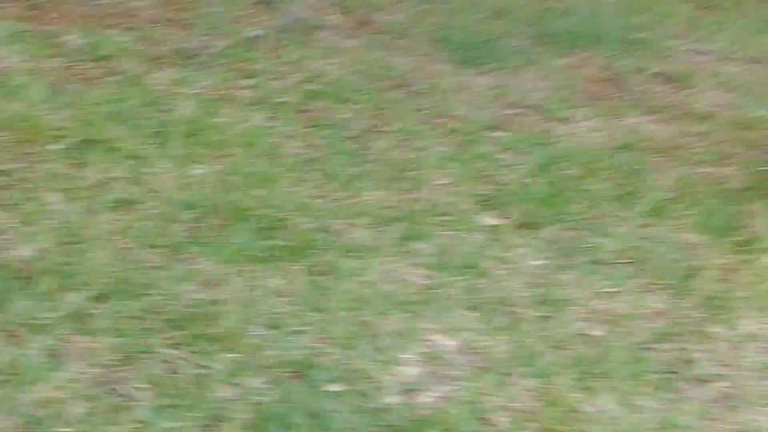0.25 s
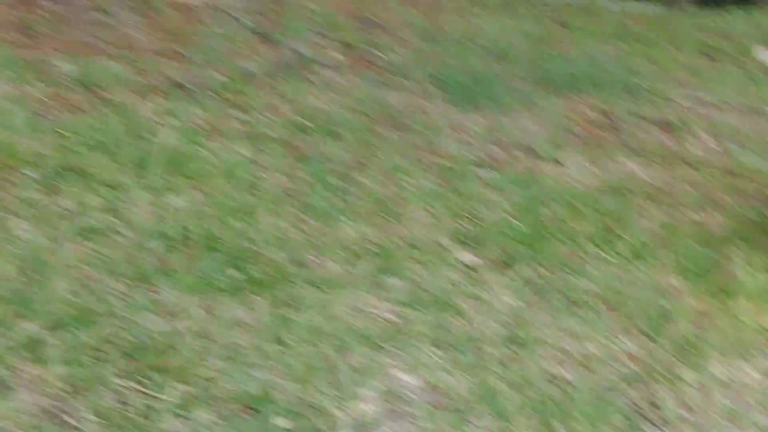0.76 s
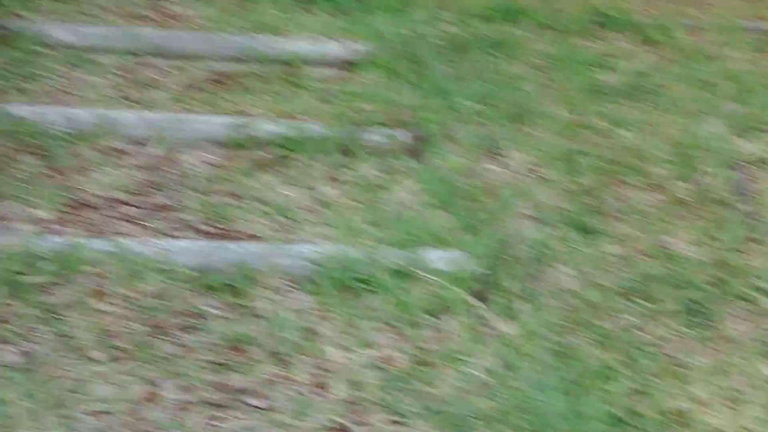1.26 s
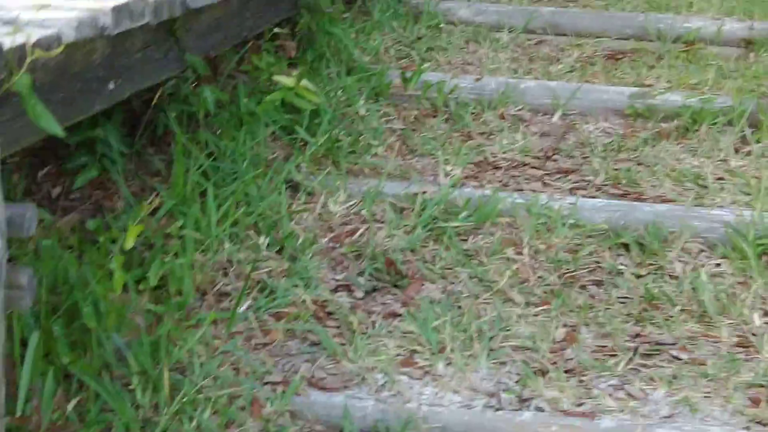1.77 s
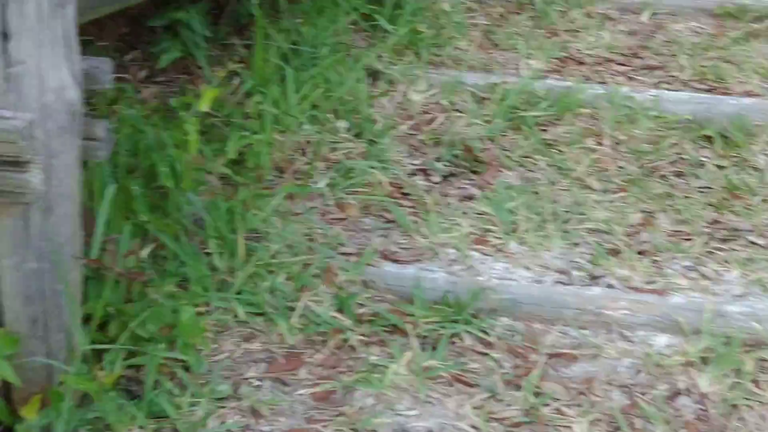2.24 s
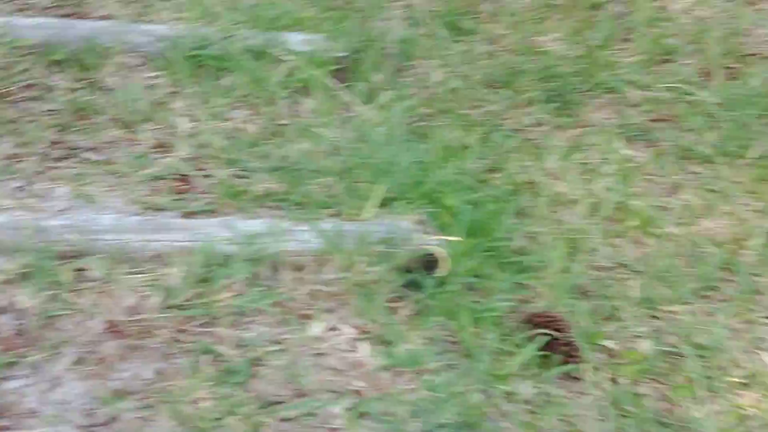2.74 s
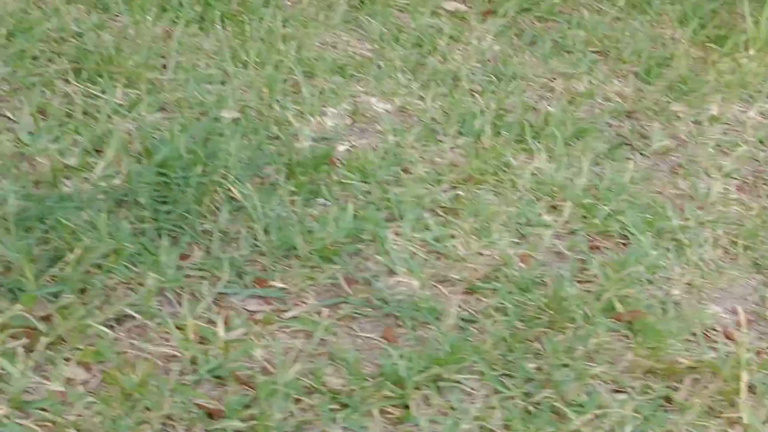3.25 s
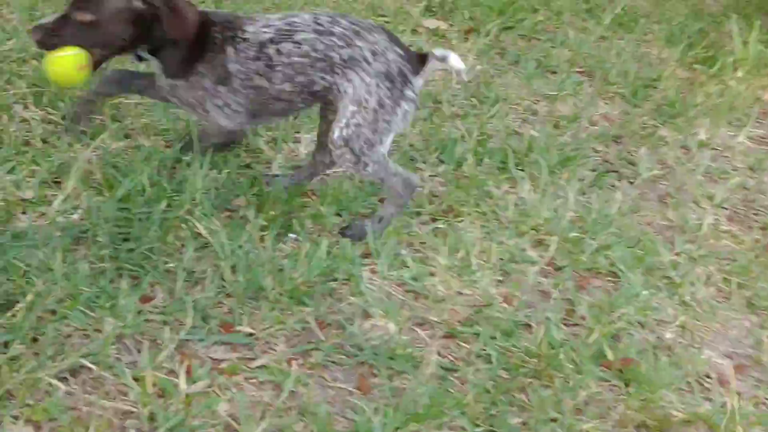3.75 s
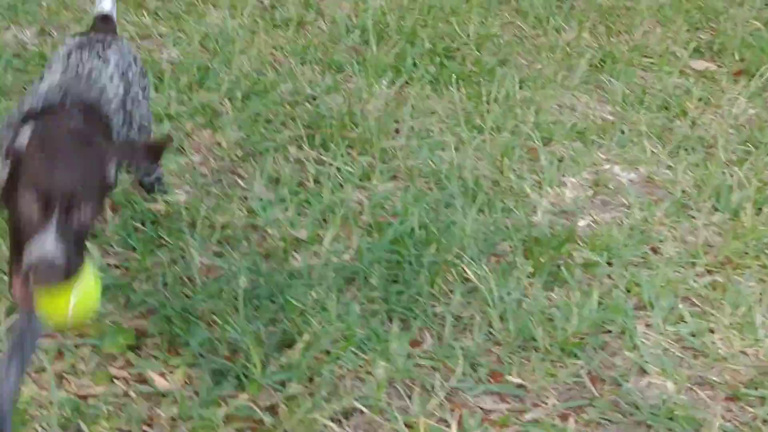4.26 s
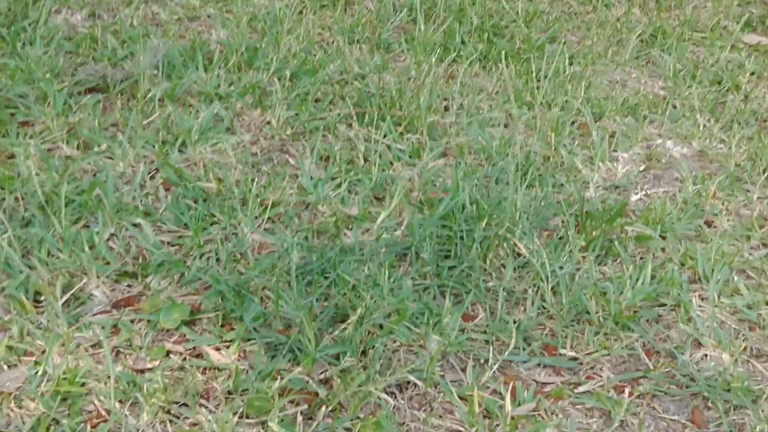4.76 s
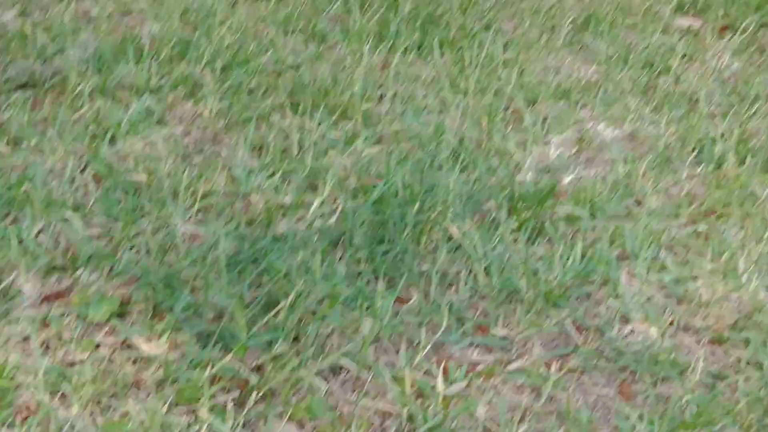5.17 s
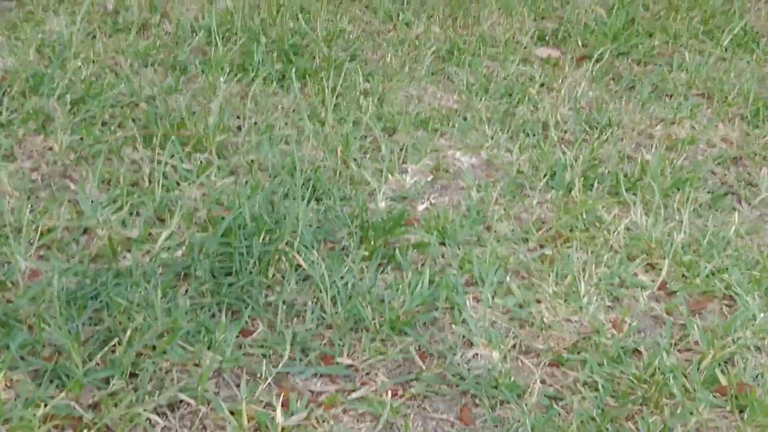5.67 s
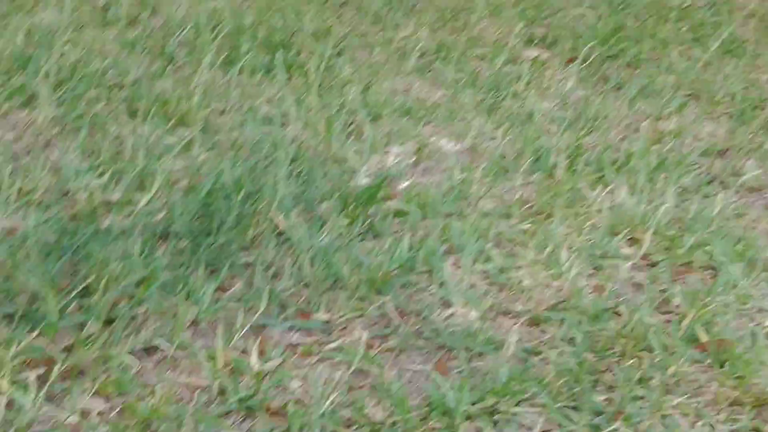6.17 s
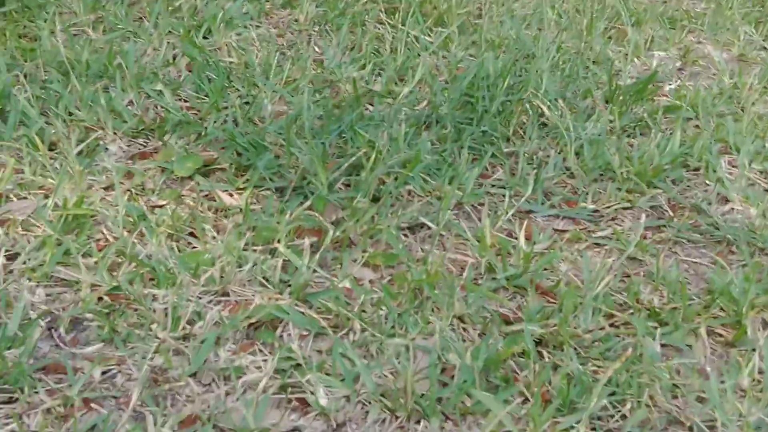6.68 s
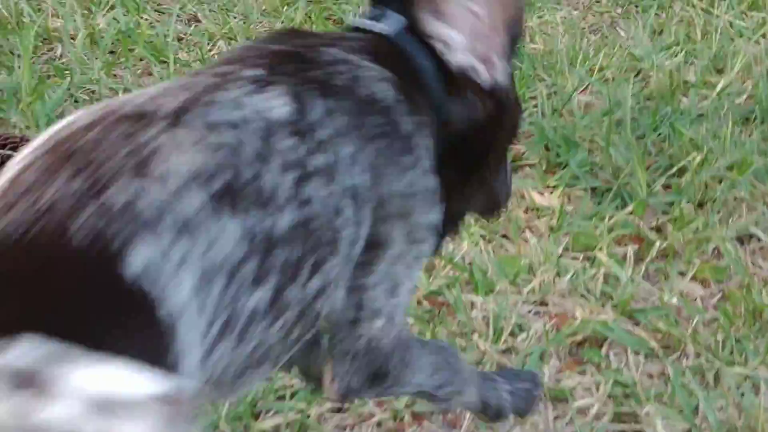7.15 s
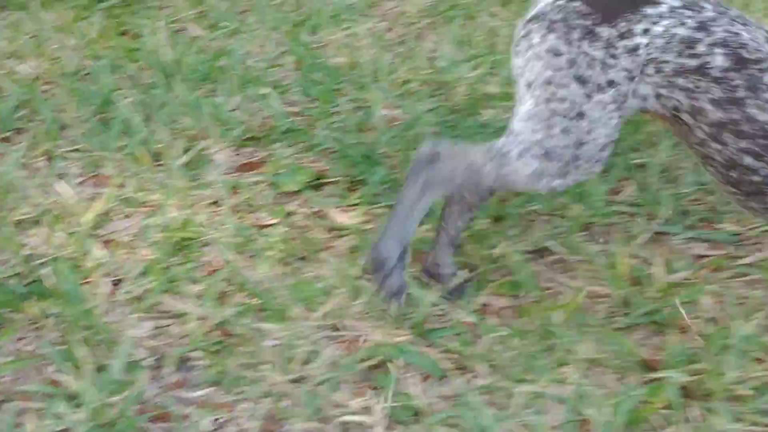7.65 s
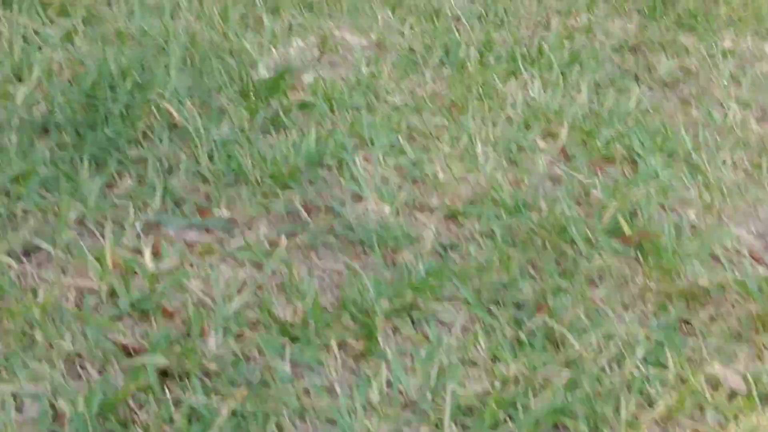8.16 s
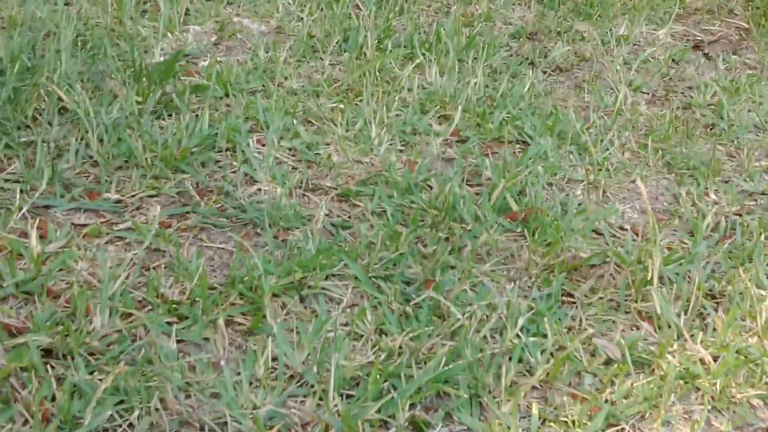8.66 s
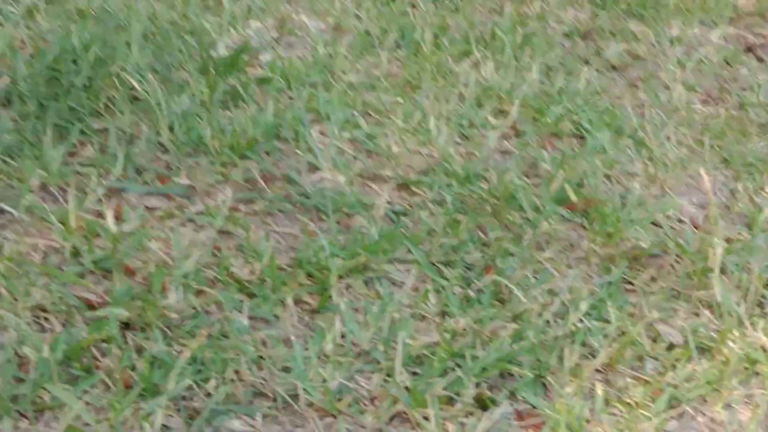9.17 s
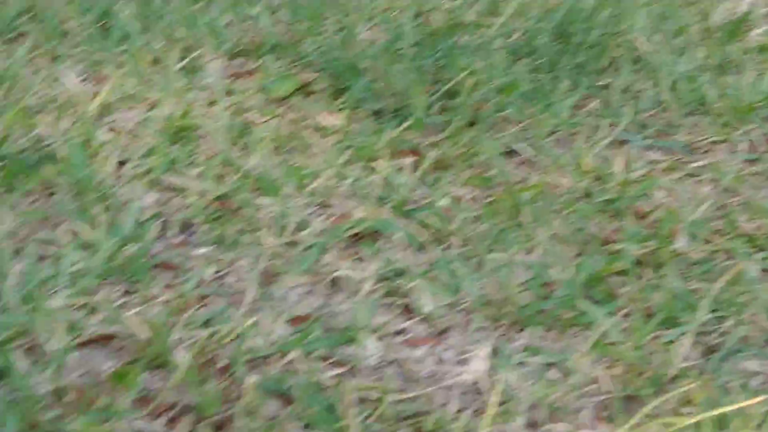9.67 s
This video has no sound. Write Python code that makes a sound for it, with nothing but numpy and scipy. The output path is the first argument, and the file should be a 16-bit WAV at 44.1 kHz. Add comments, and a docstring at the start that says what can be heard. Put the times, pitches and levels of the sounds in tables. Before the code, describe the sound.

Outdoor close stereo pickup of a young dog carrying a ball: two low muffled growls, a short gap with sniffs, then regular gurgling, raspy growls nearly every second. Some tighten into short whines; the middle ones are strongest, followed by a clipped snort and several quick nose puffs. The dog shifts from side to side. Grass rustles softly, twigs tick, and wind puffs occasionally over a very quiet garden hum.

```python
"""Puffs of wind over a faint garden hum and rustle of grass, with rough, snorting dog growls close by throughout.
A puppy runs over a lawn with a ball: filtered noise makes short hisses, rustling or breathy, and dry ticks.
Growls attack, hold and release with surges and brief slackenings of effort: irregular slaps of loose throat
tissue and beating air drive chest, mouth and upper-throat resonances, which at times lock into whines.
Hard flaps kick the mouth; among the growls come snuffs of turbulent nose noise and short voiced grunts."""
import sys
import numpy as np
from scipy import signal
from scipy.fft import rfft, irfft, next_fast_len
from scipy.io import wavfile
from scipy.ndimage import uniform_filter1d, map_coordinates

SR = 44100
rng = np.random.default_rng(int(sys.argv[2]) if len(sys.argv) > 2 else 0)


def output_pcm(signal):
    """Save a mono or channel-first signal as 16-bit PCM at the path in sys.argv[1].

    Samples are clipped to [-1, 1] before scaling.
    """
    pcm = np.clip(np.atleast_2d(signal).T, -1, 1) * 32767
    wavfile.write(sys.argv[1], SR, np.round(pcm).astype(np.int16))


N = 437472
TIME_S = np.arange(N) / SR
CONTROL_S = np.arange(0, N + 128, 128) / SR  # coarse grid for slow envelopes

# Chest colour. Each row: frequency in Hz, relative gain in dB.
CHEST_COLOUR = [(40, -80), (90, -18.5), (130, -0.5), (185, -0.5), (270, -3.5), (380, 0), (480, -11.5),
                (650, -15.5), (1000, -44.5), (4000, -63.5)]
# Broad throat colour. Each row: frequency in Hz, relative gain in dB.
PHARYNX_COLOUR = [(100, -38.5), (370, -4), (490, 3), (630, 4.5), (850, 2.5), (1150, -1), (1400, -7),
                  (1750, -25.5), (5000, -27.5)]
# Mouth colour. Each row: frequency in Hz, relative gain in dB.
MOUTH_COLOUR = [(100, -39), (300, -3.5), (480, -15), (650, 2.5), (1100, 3), (1400, -16), (1800, -39),
                (2300, -51.5), (5000, -44)]


def amp(db):
    """Decibels to gain."""
    return np.exp(np.asarray(db) * (np.log(10) / 20))


def unit(x):
    """Scale to rms 1."""
    return x / np.sqrt(np.mean(x ** 2) + 1e-20)


def along(points, hz):
    """Read (Hz, value) points on a log frequency axis."""
    point_hz, values = np.transpose(points)
    return np.interp(np.log(hz + 1), np.log(point_hz + 1), values)


def curves(rows):
    """One interpolated curve per column after the time in seconds."""
    s, *columns = np.transpose(rows)
    return [np.interp(TIME_S, s, column) for column in columns]


def per_sample(control):
    """Spread a control from the coarse time grid over every sample."""
    return np.interp(TIME_S, CONTROL_S, control)


def swells(middle_s, length_s, height, squareness):
    """A sum of rounded humps, one per event."""
    away = np.abs(2 * (CONTROL_S[:, None] - middle_s) / length_s)
    return per_sample(np.exp(-np.minimum(away, 10) ** squareness) @ height)


def wobble(knots_per_s):
    """A smooth random curve through normally distributed knots."""
    steps = np.arange(0, N + 16, 16)
    knots = rng.standard_normal(int(N * knots_per_s / SR) + 4)
    return np.interp(np.arange(N), steps, map_coordinates(knots, [steps * knots_per_s / SR]))


def filtered(x, response):
    """Multiply the spectrum of x by a complex response of frequency."""
    size = 2 * next_fast_len(N // 2 + 8192)
    return irfft(rfft(x, size) * response(np.fft.rfftfreq(size, 1 / SR)), size)[..., :N]


def coloured(x, points):
    """Causal minimum-phase filter with the given (Hz, dB) shape."""
    size = 16384
    cepstrum = irfft(np.log(amp(along(points, np.fft.rfftfreq(size, 1 / SR)))))
    # fold the cepstrum forward in time
    cepstrum[1:size // 2] *= 2
    cepstrum[size // 2 + 1:] = 0
    response = irfft(np.exp(rfft(cepstrum)))[:size // 2]
    return signal.oaconvolve(x, response if x.ndim == 1 else response[None], axes=-1)[..., :N]


def resonate(x, hz, width_hz):
    """A resonance whose centre moves; a unit impulse rings at height 1."""
    turn = np.exp(2j * np.pi * np.cumsum(hz) / SR)
    decay = np.exp(-np.pi * width_hz / SR)
    return (turn * signal.lfilter([1], [1, -decay], x / turn)).imag


def steady(x):
    """Hold the rms near 1 over a few hundredths of a second, keeping single pulses."""
    power = uniform_filter1d(uniform_filter1d(x ** 2, size=1100), size=1100)
    return x / np.sqrt(np.abs(power) + 1e-4 * np.mean(x ** 2))


def patchy(x, depth_db):
    """Random gain patches, a few hundred Hz wide and a few hundredths of a second long."""
    spectrum = signal.stft(x, nperseg=512)[2]
    field = rng.standard_normal(spectrum.shape[-2:])
    for _ in range(2):
        field = uniform_filter1d(field, size=4, axis=0)
        field = uniform_filter1d(field, size=9, axis=1)
    return signal.istft(spectrum * amp(depth_db * unit(field)), nperseg=512)[1][..., :N]


def impulses(times_s, sizes):
    """Single-sample kicks."""
    samples = np.round(np.asarray(times_s) * SR).astype(int)
    return np.bincount(np.clip(samples, 0, N), sizes, N + 1)[:N]


def fading(x, life_s):
    """Give every kick an exponential tail."""
    return signal.lfilter([1], [1, -np.exp(-1 / (life_s * SR))], x)


def scattered(x, share):
    """Echoes off ground and body reach each port with strengths that drift as things move."""
    delays = (rng.uniform(.0003, .005, size=(2, 5)) * SR).astype(int)  # samples, by port and echo
    knots = np.linspace(0, N, 60)
    strengths = rng.standard_normal(delays.shape + knots.shape)
    strengths /= np.linalg.norm(strengths, axis=1, keepdims=True)  # echoes trade a fixed power
    echoes = np.zeros((2, N))
    for port in range(2):
        for delay, drift in zip(delays[port], strengths[port]):
            echoes[port] += np.interp(np.arange(N), knots, drift) * np.pad(x, (delay, 0))[:N]
    return (x + share * echoes) / np.sqrt(1 + share ** 2)


def wind():
    """Puffs of wind buffet the microphone ports as low-frequency noise."""
    # Each row: middle in seconds, length in seconds, relative level in dB.
    gusts = [(0.01, 0.074, -46), (0.24, 0.19, -49.5), (2.19, 0.63, -53.5), (2.582, 0.079, -45),
             (2.956, 0.14, -40.5), (3.081, 0.046, -42.5), (3.174, 0.09, -38)]
    # Each row: frequency in Hz, relative gain in dB.
    buffet_colour = [(20, -37), (60, 5), (100, 4.5), (160, 2.5), (300, -19), (1000, -95)]
    middle_s, length_s, db = np.transpose(gusts)
    buffet = steady(coloured(rng.standard_normal(N), buffet_colour))
    return swells(middle_s, length_s, amp(db + 7.5), squareness=2.3) * buffet


def garden():
    """A low noise rumble, a narrow-band drone that wavers, a faint high hiss, and wind."""
    # Each row: frequency in Hz, relative gain in dB.
    hum_colour = [(25, -35), (55, -14), (85, -8.5), (115, 0), (190, 1), (300, -10), (500, -18),
                  (1000, -16.5), (1800, -29.5), (3500, -29.5), (12000, -69)]
    # Each row: frequency in Hz, relative gain in dB.
    hiss_colour = [(1000, -31), (4500, -19), (6200, -12.5), (7700, -6.5), (9500, -14.5), (15000, -15.5)]
    rumble = amp(-48.0 + 1.5 * wobble(9.2)) * unit(coloured(rng.standard_normal(N), hum_colour))
    drone = amp(-49.0) * unit(resonate(rng.standard_normal(N), np.full(N, 114), width_hz=4.3))
    hiss = amp(-59.5 + 2.3 * wobble(8)) * unit(coloured(rng.standard_normal((2, N)), hiss_colour))
    return scattered(rumble + drone + wind(), share=0.62) + hiss


def grass():
    """Dense tiny noise grains rustle and hiss; twigs and dry leaves snap in short noise bursts."""
    # Short hisses: rustling grass and some breathy bursts with the growls.
    # Each row: middle in seconds, length in seconds, relative level in dB.
    hisses = [(0.248, 0.38, -53), (1.238, 0.14, -53.5), (1.459, 0.13, -62.5), (1.79, 0.31, -59.5),
              (3.258, 0.11, -49.5), (3.62, 0.26, -54), (3.985, 0.49, -55), (4.435, 0.26, -52.5),
              (4.776, 0.15, -44.5), (5.486, 0.17, -52), (6.567, 0.075, -43), (6.95, 0.19, -57),
              (7.382, 0.33, -53), (7.672, 0.16, -47.5), (7.938, 0.25, -53), (8.284, 0.21, -48.5),
              (9.01, 0.19, -51.5), (9.684, 0.16, -56)]
    # Twigs and dry leaves. Each row: time in seconds, relative peak in dB.
    ticks = [(2.022, -25), (2.1397, -30.5), (2.728, -22), (3.89, -26.5), (4.538, -27.5), (4.612, -32.5),
             (4.7312, -22.5), (7.385, -27), (7.469, -31.5)]
    # Each row: frequency in Hz, relative gain in dB.
    blade_colour = [(300, 18.3), (1100, 11), (2200, 4), (4000, 4.2), (7500, 4.2), (10000, 0.78),
                    (15000, 1.6)]
    middle_s, length_s, db = np.transpose(hisses)
    lawn = amp(-66.5)  # faint rustle between the hisses
    stir = lawn + swells(middle_s, length_s, amp(db), squareness=3.8)
    grains = amp(2.1 * wobble(460) + 4.3 * wobble(35) + 1.2 * wobble(12))
    brush = patchy(coloured(grains * rng.standard_normal(N), blade_colour), depth_db=2.5)
    rustle = stir * amp(4.5) * unit(brush)
    tick_s, peak_db = np.transpose(ticks)
    small = impulses(rng.uniform(0, N / SR, size=70), amp(rng.uniform(-1, 9, size=70))) * stir
    kicks = impulses(tick_s, amp(peak_db - 14.0)) + 1.68 * small
    snaps = fading(kicks, life_s=0.0028) * rng.standard_normal(N)
    return scattered(rustle + coloured(snaps, blade_colour), share=0.65)


def throat(flap_hz, jitter, scatter_db):
    """Slaps of loose tissue, uneven in spacing and strength."""
    gaps_s = np.exp(jitter * rng.standard_normal(4000)) / flap_hz
    return impulses(np.cumsum(gaps_s), amp(scatter_db * rng.standard_normal(len(gaps_s))))


def rattle():
    """Tissue slaps quickly; slower uneven throat openings bunch the slaps and the escaping air."""
    beats = throat(flap_hz=66, jitter=.24, scatter_db=2)
    pulses = unit(fading(fading(beats, life_s=.002), life_s=.004))
    opening = unit(.55 + pulses)  # never quite shut
    slaps = unit(throat(flap_hz=190.55, jitter=.27, scatter_db=0.5))
    breath = unit(fading(slaps, life_s=0.0054)) + 0.83
    air = unit(opening * breath * rng.standard_normal(N))
    return slaps, opening, air


def growl_controls():
    """Gains of mouth ring, chest, rasp and second mouth resonance, following the effort of each growl."""
    # The attack leads up to the hold. Each row: hold start, attack, hold and release in seconds,
    # then relative levels in dB of mouth ring, chest, rasp and second mouth resonance.
    growl_rows = [(0.117, 0.068, 0.5, 0.058, -41, -38.5, -62.5, -70),
                  (0.85, 0.032, 0.43, 0.063, -40.5, -38.5, -66.5, -55.5),
                  (2.429, 0.1, 0.37, 0.16, -35, -31, -57, -63),
                  (3.229, 0.041, 0.51, 0.0086, -33.5, -36, -56.5, -49.5),
                  (3.98, 0.019, 0.56, 0.032, -33.5, -33, -59.5, -52),
                  (4.785, 0.039, 0.49, 0.24, -28, -31, -54.5, -43.5),
                  (5.65, 0.059, 0.58, 0.063, -31.5, -35.5, -59, -46.5),
                  (6.477, 0.018, 0.13, 0.095, -30, -35.5, -45, -38),
                  (7.369, 0.039, 0.53, 0.074, -36.5, -31.5, -51, -47),
                  (8.203, 0.044, 0.53, 0.075, -38.5, -31, -53.5, -51),
                  (9.001, 0.039, 0.48, 0.083, -38, -36, -58.5, -47)]
    # Surges and brief slackenings of effort. Each row: middle in seconds, length in seconds,
    # then changes in dB of mouth ring, chest, rasp and second mouth resonance.
    efforts = [(0.26, 0.088, 7, -0.5, 9.5, 2), (0.414, 0.07, 15.5, 4, 6, 12),
               (0.506, 0.037, -19, -7, -10, -9), (0.57, 0.1, 18, 7.5, 15.5, 17),
               (0.88, 0.036, 4.5, 3, -0.5, -4), (1.168, 0.057, -2, 3, 15.5, 17),
               (1.268, 0.11, -4.5, 2, 10.5, -4), (2.464, 0.043, 4.5, -2.5, -2, -3),
               (2.616, 0.18, 10.5, -5.5, 3, -1), (3.266, 0.04, 8, 6, 2, 6), (3.372, 0.051, 13, 0, 1.5, 10),
               (4.159, 0.14, 12.5, -5, 7.5, 15.5), (4.299, 0.11, 13, -3, 18, 21),
               (4.374, 0.05, 9.5, -0.5, 3.5, 6.5), (4.469, 0.15, 18, 2.5, 15.5, 23),
               (4.816, 0.067, 5.5, 6, 4, 7.5), (4.897, 0.15, 6.5, -1.5, 5.5, 7.5),
               (5.032, 0.096, 11, -1, -2, 12), (5.22, 0.065, 6, 5, 4.5, 8), (5.672, 0.21, 5, 4, 2.5, 8),
               (5.874, 0.097, 8.5, 3, 3, 8), (6.489, 0.082, 9.5, 11.5, 1.5, 1.5),
               (6.571, 0.052, 13, 5, 7, -1), (7.369, 0.13, 9.5, 5, 5, -1), (7.615, 0.24, 0, -5, -15.5, 6),
               (7.756, 0.068, 6.5, 2.5, -4, 4), (7.935, 0.083, 1, -2, 12, 11),
               (8.303, 0.087, 10.5, -0.5, 14, 2), (8.391, 0.1, 8.5, -5, 6, 14),
               (8.493, 0.098, 16, -1, 10.5, 17.5), (8.586, 0.096, 16.5, -0.5, 1.5, 6),
               (8.684, 0.073, 17.5, 4, 8, 9), (9.051, 0.15, 12.5, 6.5, 6.5, -10),
               (9.367, 0.17, 12, 1, 5, -4)]
    fade_db = 34.5  # climb over the attack time, fall over the release time
    start_s, attack_s, hold_s, release_s, *levels_db = np.transpose(growl_rows)
    t = CONTROL_S[:, None]
    before = np.maximum(start_s - t, 0) / attack_s
    after = np.maximum(t - start_s - hold_s, 0) / release_s
    envelopes = amp(-fade_db * np.minimum(before + after, 10))
    middle_s, length_s, *changes_db = np.transpose(efforts)
    ring, chest, rasp, overtone = [
        per_sample(envelopes @ amp(level)) * amp(swells(middle_s, length_s, change, squareness=3.4))
        for level, change in zip(levels_db, changes_db)]
    tremor = wobble(22)  # unsteady effort
    return ring * amp(1.5 * tremor), chest * amp(2 * tremor), rasp, overtone


def chest_sound(slaps, opening, air):
    """Slaps ring the chest, whose resonance rises as the throat tightens."""
    # Throat tightenings. Each row: middle in seconds, length in seconds.
    tightenings = [(0.17, 0.13), (2.48, 0.085), (5.22, 0.092), (7.394, 0.084), (8.674, 0.049)]
    rest_hz, rise_hz = 198.3, 109.4
    middle_s, length_s = np.transpose(tightenings)
    chest_hz = rest_hz + rise_hz * swells(middle_s, length_s, np.ones(len(middle_s)), squareness=2)
    thud = unit(slaps * np.sqrt(opening)) + 0.2 * air
    ringing = patchy(resonate(thud, chest_hz, width_hz=193), depth_db=3)
    return amp(2.0) * steady(coloured(ringing, CHEST_COLOUR))


def whines(mouth_hz):
    """Flapping locks onto the mouth resonance: the locked share and a nearly pure tone."""
    # Each row: middle in seconds, length in seconds, lift over the ring in dB.
    whine_rows = [(0.422, 0.028, -0.5), (0.551, 0.016, 0), (0.586, 0.036, -1), (2.469, 0.028, 4.5),
                  (2.615, 0.058, 1.5), (3.374, 0.043, -0.5), (4.107, 0.022, 5.5), (4.16, 0.042, 5),
                  (4.226, 0.013, 4), (4.361, 0.026, 4), (4.405, 0.057, 1), (4.49, 0.04, 4),
                  (5.016, 0.052, 1.5), (5.131, 0.032, 8), (5.237, 0.024, 3.5)]
    middle_s, length_s, lift_db = np.transpose(whine_rows)
    locked = np.clip(swells(middle_s, length_s, np.ones(len(middle_s)), squareness=2.5), 0, 1)
    phase = 2 * np.pi * np.cumsum(mouth_hz * np.exp(0.02962 * wobble(130))) / SR
    wave = np.sin(phase) + amp(-32) * np.sin(2 * phase)
    tone = steady(wave * amp(2.5 * wobble(150)))
    return locked, tone * swells(middle_s, length_s, amp(lift_db), squareness=12)


def mouth_ring(slaps, opening, air, mouth_hz, ring_over_chest_db):
    """Slaps and air ring a broad pharynx and a sharp mouth; whines replace part of the ring."""
    drive = unit(slaps * opening) + 0.63 * air
    pharynx_hz = mouth_hz * np.exp(0.05 * wobble(30))
    pharynx = resonate(resonate(drive, pharynx_hz, width_hz=276), pharynx_hz, width_hz=510)
    broad = steady(coloured(patchy(pharynx, depth_db=5.5), PHARYNX_COLOUR))
    main = resonate(drive, mouth_hz * np.exp(0.035 * wobble(45)), width_hz=39)
    upper_hz = 1.222 * mouth_hz * np.exp(0.057 * wobble(25))
    cavity = main + 0.15 * resonate(drive, upper_hz, width_hz=35)
    narrow = steady(coloured(cavity * np.sqrt(opening), MOUTH_COLOUR))
    # a ring strong against the chest favours the sharp resonance
    sharp = np.clip(0.52 + ring_over_chest_db / 80, .1, .9)
    rough = steady((1 - sharp) * broad + sharp * narrow)
    locked, whine = whines(mouth_hz)
    return amp(0.6) * (amp(-6 * locked) * rough + whine)


def second_resonance(fricative):
    """Slaps and air ring a second mouth resonance that glides with the tongue."""
    # Tongue movement. Each row: time in seconds, resonance in Hz before its random waver.
    tongue = [(0.2, 1880), (0.95, 1370), (1.17, 1890), (2.6, 1674), (4.4, 1716), (4.5, 1850), (4.84, 1980),
              (4.92, 1434), (5.02, 1305), (5.22, 1650), (7.48, 1460), (7.6, 1630), (8.33, 1610),
              (8.42, 1820), (8.55, 1770), (9.45, 1600)]
    # Each row: frequency in Hz, relative gain in dB.
    palate_colour = [(500, -49), (1000, 1.5), (1350, -3), (1900, -10.5), (2300, -16), (3000, -14),
                     (5000, -38.5)]
    tongue_hz = curves(tongue)[0] * np.exp(0.029 * wobble(40))
    second = resonate(resonate(fricative, tongue_hz, width_hz=400), tongue_hz, width_hz=410)
    return amp(-2.5) * steady(coloured(second, palate_colour))


def throat_rasp(fricative):
    """Escaping air rasps through an upper throat resonance moved by snarling."""
    # Each row: time in seconds, upper throat resonance in Hz.
    snarl = [(0.2, 3350), (1.17, 2740), (2.47, 3670), (2.57, 3810), (2.64, 3370), (2.78, 3130), (6.2, 3360),
             (6.55, 3560), (7.9, 3150), (8.33, 3310), (8.45, 2740), (8.55, 2730), (8.67, 3030),
             (9.26, 2810), (9.36, 3200)]
    # Each row: frequency in Hz, relative gain in dB.
    rasp_colour = [(600, -33), (1200, -2.5), (1700, -2), (2200, -2.5), (2800, -0.5), (3300, -9.5),
                   (4050, 0), (4900, -11), (6400, -15.5), (7900, -7.5), (9500, -22), (15000, -23.5)]
    snarl_hz, = curves(snarl)
    third = unit(resonate(fricative, snarl_hz, width_hz=480))
    hoarse = coloured(unit(fricative) + 0.83 * third, rasp_colour)
    return amp(4.5) * steady(patchy(hoarse, depth_db=4))


def hard_flaps(mouth_hz):
    """Single hard flaps ring the mouth through two resonances, so each swells before it dies."""
    # Each row: time in seconds, relative peak in dB.
    flap_rows = [(0.539, -18.5), (2.584, -19), (2.698, -18), (3.343, -19.5), (3.982, -24), (4.142, -14),
                 (4.262, -14), (4.3, -13.5), (4.468, -12.5), (4.797, -16), (4.821, -12.5), (4.854, -11.5),
                 (4.96, -15.5), (5.001, -6.5), (5.126, -14), (5.181, -19), (5.845, -12.5), (6.469, -21),
                 (6.485, -7.5), (6.547, -11), (6.567, -13), (6.581, -5), (7.371, -16), (7.498, -20),
                 (7.568, -23.5), (7.656, -25.5), (8.454, -16.5), (8.494, -14), (8.511, -13), (8.585, -15),
                 (8.607, -21), (8.664, -14), (9.001, -17.5), (9.017, -11.5), (9.092, -24)]
    flap_s, db = np.transpose(flap_rows)
    kicks = coloured(impulses(flap_s - .002, amp(db)), MOUTH_COLOUR)
    return amp(-25.5) * resonate(resonate(kicks, mouth_hz, width_hz=135), mouth_hz, width_hz=196)


def growls():
    """Slaps ring chest and mouth; air escaping with each beat rasps."""
    # The jaw moves around the ball: one path per growl.
    # Each row of a path: time in seconds, mouth resonance in Hz.
    jaw = [
        [(0.1, 975.2), (0.2, 830), (0.25, 910), (0.33, 860), (0.41, 670), (0.48, 715.2), (0.53, 870),
         (0.62, 970)],
        [(0.9, 660.5), (0.98, 920), (1.03, 820), (1.16, 830), (1.23, 730), (1.3, 800)],
        [(2.39, 899.5), (2.44, 690), (2.485, 670), (2.53, 799.8), (2.6, 869.4), (2.82, 740)],
        [(3.2, 1030), (3.29, 964.5), (3.54, 895), (3.64, 800), (3.69, 944.8)],
        [(3.98, 860), (4.11, 920), (4.19, 850), (4.235, 900), (4.355, 826), (4.42, 842), (4.48, 928.7),
         (4.51, 935), (4.54, 860)],
        [(4.79, 831.6), (4.9, 885), (4.945, 990), (4.98, 884), (5.06, 935), (5.09, 800.4), (5.14, 870),
         (5.195, 730), (5.31, 855)],
        [(5.64, 802), (5.68, 863), (5.73, 800), (5.91, 927), (6.07, 688), (6.16, 864), (6.25, 950)],
        [(6.49, 781), (6.6, 850)],
        [(7.37, 810), (7.45, 746), (7.48, 1053), (7.69, 1006), (7.715, 788), (7.84, 846), (7.9, 990)],
        [(8.22, 812), (8.26, 900), (8.32, 990), (8.365, 670), (8.41, 657), (8.48, 842), (8.55, 770),
         (8.64, 924), (8.73, 855)],
        [(9.0, 930), (9.075, 906), (9.135, 1000), (9.22, 880), (9.38, 887), (9.47, 982)],
    ]
    mouth_hz, = curves(np.vstack(jaw))
    ring_gain, chest_gain, rasp_gain, overtone_gain = growl_controls()
    slaps, opening, air = rattle()
    chest = chest_gain * chest_sound(slaps, opening, air)
    ring_over_chest_db = 20 * np.log10(ring_gain / chest_gain)
    ring = ring_gain * mouth_ring(slaps, opening, air, mouth_hz, ring_over_chest_db)
    fricative = unit(slaps * opening) + 2.05 * air
    overtone = overtone_gain * second_resonance(fricative)
    rasp = rasp_gain * throat_rasp(fricative)
    body = chest + ring + overtone + hard_flaps(mouth_hz)
    return scattered(body, share=0.48) + scattered(rasp, share=1.0)


def grunts():
    """Short voiced pushes: throat slaps coloured by chest and pharynx."""
    # Each row: time in seconds, relative peak in dB.
    grunt_rows = [(1.605, -39.5), (1.967, -31.5), (5.35, -36), (8.791, -34), (9.783, -30)]
    grunt_s, peak_db = np.transpose(grunt_rows)
    kicks = impulses(grunt_s, amp(peak_db))
    push = fading(fading(kicks, life_s=0.044), life_s=0.0045) / (0.0058 * SR)
    slaps = throat(flap_hz=169.9, jitter=0.17, scatter_db=0.5)
    voice = steady(coloured(slaps, CHEST_COLOUR)) + 0.49 * steady(coloured(slaps, PHARYNX_COLOUR))
    return push * voice


def snuffs():
    """Short turbulent puffs through the nose, with grunts ahead of some."""
    # Each row: middle in seconds, length in seconds, relative level in dB, nose resonance in Hz.
    snuff_rows = [(0.704, 0.071, -52.5, 1030), (1.7, 0.16, -46, 1090), (2.08, 0.077, -47, 1290),
                  (2.41, 0.04, -55, 1060), (2.89, 0.072, -46, 970), (3.847, 0.07, -48.5, 1090),
                  (4.621, 0.066, -34.5, 990), (5.55, 0.082, -46, 940), (6.361, 0.11, -51.5, 1110),
                  (6.641, 0.053, -42, 950), (6.712, 0.037, -50.5, 1470), (6.813, 0.052, -50.5, 970),
                  (6.898, 0.042, -41.5, 1300), (6.952, 0.074, -38.5, 1570), (7.117, 0.085, -53, 1520),
                  (9.864, 0.12, -47.5, 920)]
    # Each row: frequency in Hz, relative gain in dB.
    nose_colour = [(200, -13), (500, -9), (800, 6.5), (1400, 11), (2000, 3.5), (3300, 0.5), (4800, -12.5),
                   (7800, -11), (10000, -37.5), (15000, -34)]
    middle_s, length_s, db, hz = np.transpose(snuff_rows)
    nose_hz = np.interp(TIME_S, middle_s, hz)
    flow = swells(middle_s, length_s, amp(db + 4.0), squareness=3.7)
    air = rng.standard_normal(N) * amp(4.3 * wobble(160))
    ringing = unit(coloured(resonate(air, nose_hz, width_hz=420), nose_colour))
    puff = unit(coloured(air, nose_colour)) + 1.47 * ringing
    return scattered(flow * steady(puff) + grunts(), share=0.44)


def ports(x):
    """Two microphone ports hear near sound with different phase and colour."""
    # Each row: frequency in Hz, phase lead of left in radians.
    port_phase = [(30, -2.3), (170, -1.6), (400, -.95), (900, -.35), (1300, .1), (1850, 1.05), (2300, 3.1),
                  (2700, 3.9), (3200, 6.2), (3900, 6.8), (4600, 9.2), (5100, 9.7), (5800, 12.5),
                  (8300, 18.8), (9500, 22), (12000, 28.3), (15500, 37.7)]
    # Each row: frequency in Hz, left minus right in dB.
    port_balance = [(100, 6.5), (300, 1.5), (900, -1), (1500, 3), (4500, 1), (7500, 8.5), (10000, 4.5),
                    (14000, 0)]

    def response(hz):
        left = amp(along(port_balance, hz) / 2) * np.exp(.5j * along(port_phase, hz))
        return np.array([left, 1 / left])

    return filtered(x, response)


def scene():
    """The dog moves from side to side across the lawn."""
    # Each row: time in seconds, left minus right of the dog in dB ahead of the ports.
    sideways = [(0.0, -18), (0.22, -6), (0.94, 2.5), (2.04, 6.5), (2.87, -4.5), (3.6, 2), (4.03, 2),
                (4.7, 1), (5.25, -1), (6.88, 2), (8.07, -3.5), (9.3, 1.5), (9.8, 7)]
    pan_db, = curves(sideways)
    dog = (growls() + snuffs()) * amp(np.array([pan_db, -pan_db]) / 2)
    return ports(garden() + grass() + dog)


def record(dry):
    """Third-order roll-off below 48 Hz; nothing from the band limit up."""
    top_hz, low_hz = 15750, 48
    return filtered(dry, lambda hz: (hz < top_hz) * hz ** 3 / np.sqrt(hz ** 6 + low_hz ** 6))


dry = scene()
out = record(dry)
output_pcm(out)
```